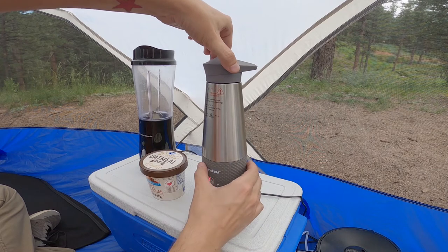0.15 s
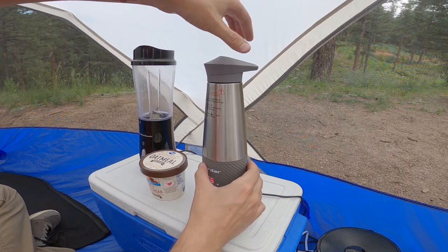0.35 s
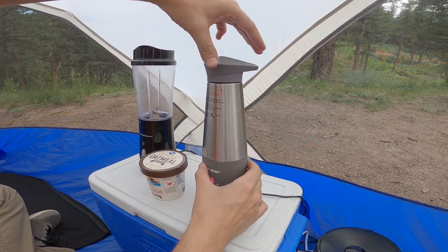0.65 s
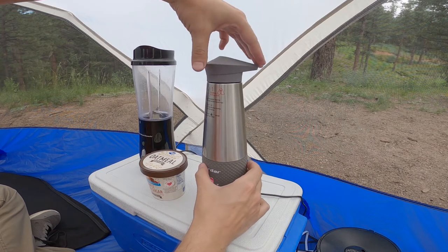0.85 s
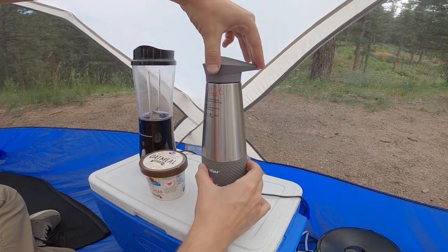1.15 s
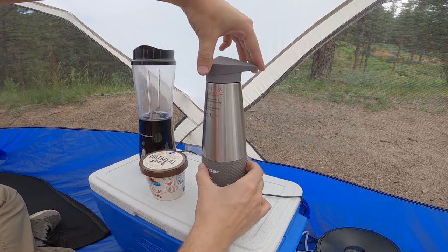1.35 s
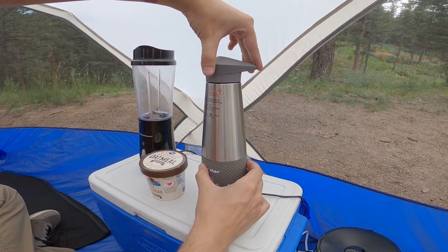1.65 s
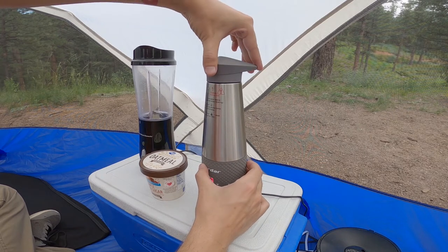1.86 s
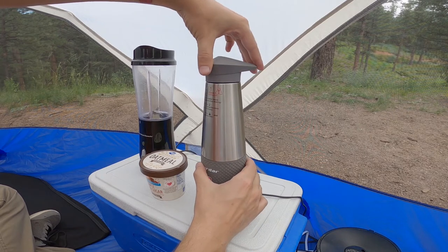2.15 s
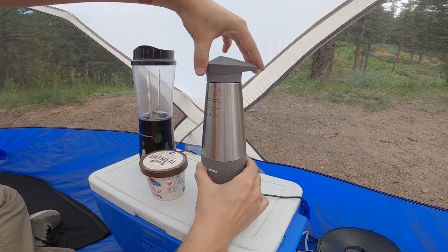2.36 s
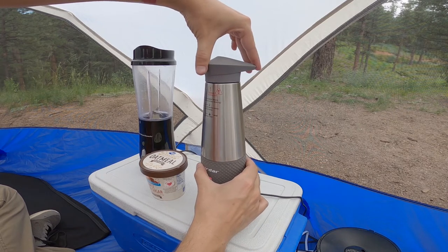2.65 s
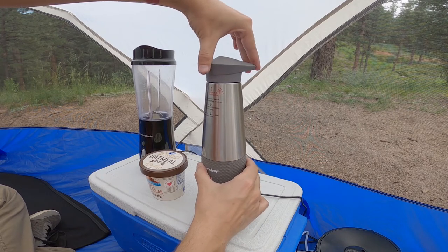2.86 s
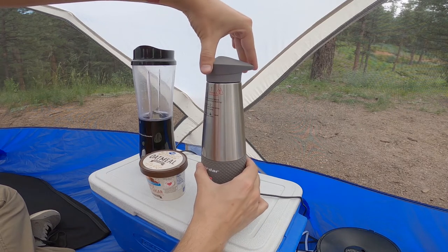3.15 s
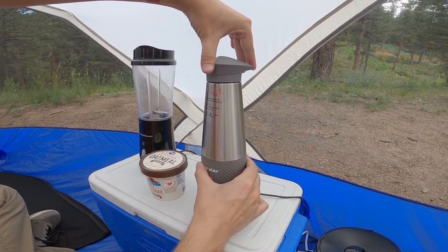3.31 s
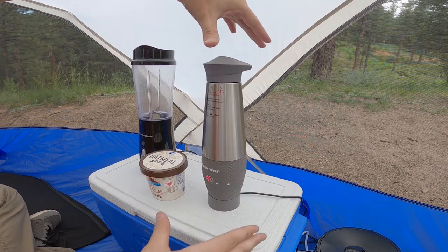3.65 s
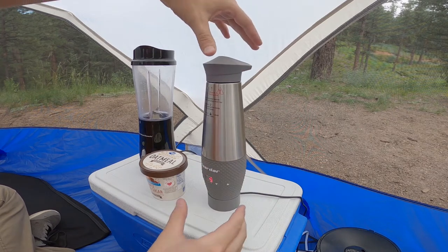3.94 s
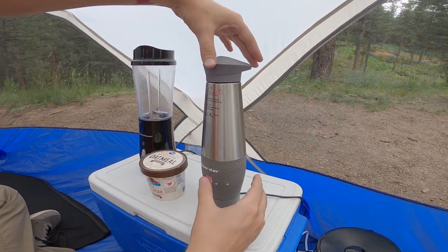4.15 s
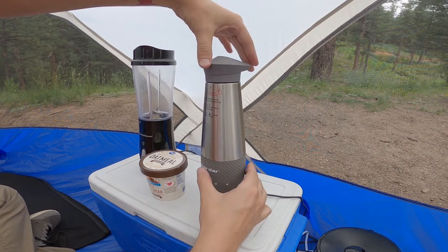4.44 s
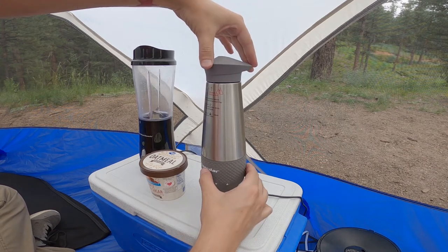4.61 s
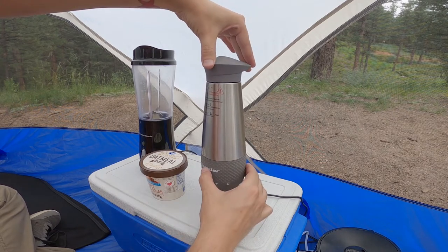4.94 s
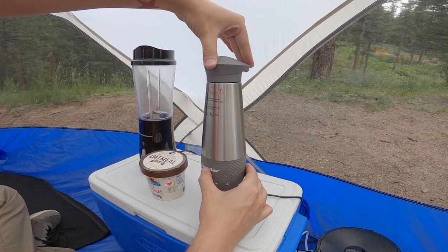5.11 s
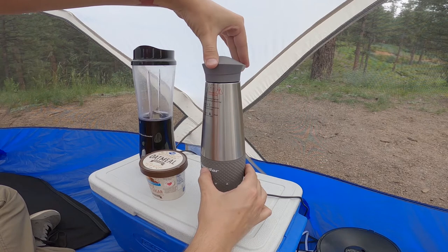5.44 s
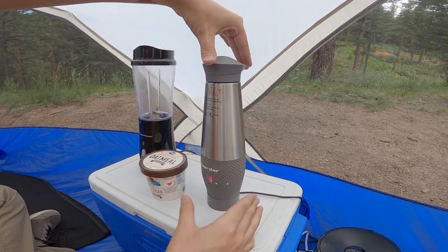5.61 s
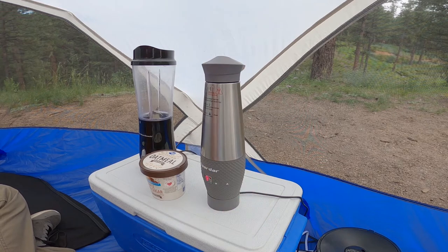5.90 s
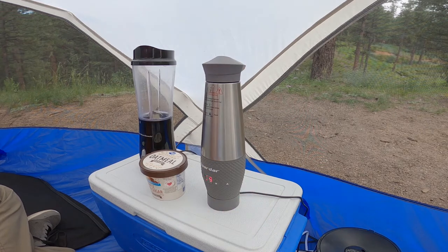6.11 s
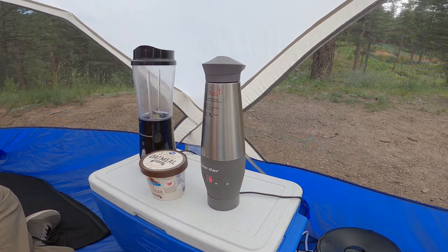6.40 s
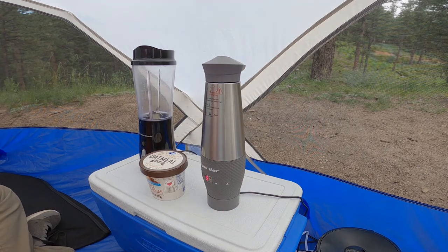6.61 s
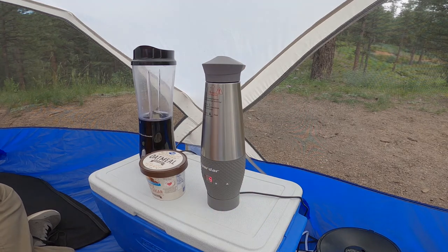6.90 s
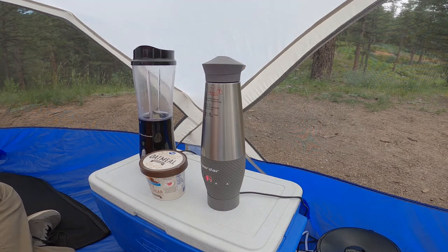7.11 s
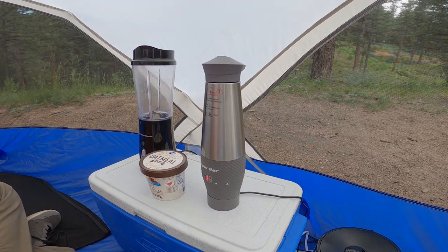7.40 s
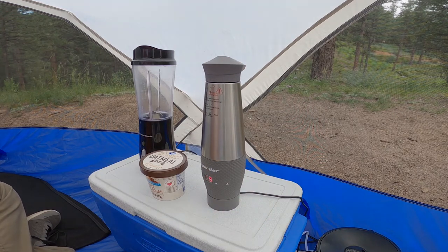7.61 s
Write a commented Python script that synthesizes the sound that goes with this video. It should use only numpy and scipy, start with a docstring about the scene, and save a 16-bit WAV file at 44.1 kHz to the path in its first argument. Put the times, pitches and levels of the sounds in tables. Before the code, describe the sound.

Very close stereo capture inside a tent: a steady, bright steam hiss leaks from a portable metal kettle, then chokes off. Small plastic ticks follow, then a cluster of sharp lid snaps and a second hiss. It stops again before a louder, open, spitting jet bursts out with a hollow gush and dull boiling thumps. Faint forest air stays underneath.

```python
"""Steam hisses from the seal of a pressurised travel kettle, stops, and escapes again after the lid ratchets round.
Patchy noise and droplet bursts make the jet, its colour shifting between two gripped vents and a free one;
once let go it blows more openly, keeping some of the second colour. Clicks snap the lid round, decaying
plastic modes make its ticks, and swells of low noise thump and boil. Faint forest air lies under it all.
The place is a tent, heard through a camera's two close microphone ports."""
import sys
import numpy as np
from scipy import signal
from scipy.fft import rfft, irfft, next_fast_len
from scipy.io import wavfile
from scipy.ndimage import uniform_filter1d, map_coordinates

SR = 44100
rng = np.random.default_rng(int(sys.argv[2]) if len(sys.argv) > 2 else 0)


def int16_out(signal):
    """Quantize to a 16-bit WAV file."""
    q = np.round(np.clip(np.atleast_2d(signal).T, -1, 1) * 32767)
    wavfile.write(sys.argv[1], SR, q.astype(np.int16))


N = 342202

# brief spurts of the open jet: (time [s], jet level [dB], throaty rush level [dB], length [s])
SPURTS = [(3.414, -37, -54, 0.012), (3.524, -33.5, -69, 0.047), (3.693, -43, -57, .025),
          (5.559, -30, -42.5, 0.027), (6.056, -26.5, -62, .02)]


def amp(db):
    """Decibels to gain."""
    return 10 ** (np.asarray(db) / 20)


def unit(x):
    """Scale to rms 1."""
    return x / np.sqrt(np.mean(x ** 2) + 1e-20)


def along(rows, hz, axis=1):
    """One column of a table, read on a log-frequency axis."""
    columns = np.transpose(rows)
    return np.interp(np.log(hz + 1), np.log(columns[0] + 1), columns[axis])


def curves(rows):
    """One value per sample for each column after the time."""
    times, *columns = np.transpose(rows)
    return [np.interp(np.arange(N) / SR, times, column) for column in columns]


def since(start):
    """Seconds elapsed since a moment, 0 before it."""
    return np.maximum(np.arange(N) / SR - start, 0)


def swell(start, rise):
    """A gain whose power climbs from 0 towards 1 after a moment."""
    return np.sqrt(1 - np.exp(-since(start) / rise))


def bell(x, centre, width):
    """A smooth hump of height 1."""
    return np.exp(-.5 * ((x - centre) / width) ** 2)


def humps(rows):
    """The summed gain of bell-shaped swells (time [s], level [dB], length [s])."""
    return sum(amp(db) * bell(np.arange(N) / SR, s, length) for s, db, length in rows)


def wobble(rate):
    """A smooth random curve with rate knots a second."""
    knots = rng.standard_normal(int(N * rate / SR) + 4)
    return map_coordinates(knots, [np.arange(N) * rate / SR])


def filtered(x, response):
    """x times a complex response of frequency."""
    m = next_fast_len(N + 8192)
    return irfft(rfft(x, m) * response(np.fft.rfftfreq(m, 1 / SR)), m)[..., :N]


def coloured(x, spectrum, bumps=()):
    """x at rms 1 with a broad spectrum and narrow resonances or notches on it."""
    def narrow_db(hz):
        return sum(db / (1 + (2 * (hz - centre) / width) ** 4) for centre, width, db in bumps)

    return unit(filtered(x, lambda hz: amp(along(spectrum, hz) + narrow_db(hz))))


def white():
    """Steady noise in three rows: direct, scattered left, scattered right."""
    return rng.standard_normal((3, N))


def turbulence(patchy_db):
    """Noise in the same three rows, its gain drifting in patches of time and frequency shared by all."""
    z = signal.stft(white(), nperseg=512)[2]
    patches = uniform_filter1d(rng.standard_normal(z.shape[1:]), size=3, axis=0)
    patches = uniform_filter1d(patches, size=24, axis=1)
    return unit(signal.istft(z * amp(patchy_db * unit(patches)), nperseg=512)[1][:, :N])


def scattered(x, t60, wet_db):
    """A sound and its short left and right echoes from the table and tent."""
    t = np.arange(SR // 8) / SR
    tails = rng.standard_normal((2, len(t))) * amp(-60 * t / t60)
    tails *= amp(wet_db) / np.linalg.norm(tails[0])
    return np.vstack([x, signal.fftconvolve(x[None], tails, axes=1)[:, :N]])


def reflected(x, echo_db, count=12):
    """Weak copies off nearby surfaces ripple the spectrum."""
    delays = rng.uniform(.002, .02, count)  # seconds
    sizes = amp(echo_db) * rng.choice([-1, 1], count) / np.sqrt(count)
    echoes = 0
    for delay, size in zip(delays, sizes):
        late = np.pad(x, ((0, 0), (round(delay * SR), 0)))[:, :N]
        echoes = echoes + size * late
    return x + echoes


def ports(field):
    """Both ports hear the direct sound, shifted and shaded by the camera body; each has its own scatter."""
    # the microphone pair: (frequency [Hz], left-right level [dB], left lag [rad], coherence [0-1])
    port_pair = [(200, 2.5, 0.45, 0.91), (500, -2.5, 0.7, 0.53), (1160, 1.3, 0.67, 0.94),
                 (2500, 2, 0.75, 0.8), (4200, 4, 0.86, 0.8), (5350, 4.4, 0.96, 0.42),
                 (6570, 9.5, 2.12, 0.87), (7110, -1, 2.54, 0.96), (7960, 8, 3.46, 0.98),
                 (8140, -11, 1.57, 1), (8700, -7.5, 1.14, 0.68), (9900, -2.5, 1.8, 0),
                 (12000, -7, 1.9, 0.4), (15000, -14.3, 1.59, 0.25)]
    sides = np.array([[1], [-1]])

    def alike(hz):
        return np.clip(along(port_pair, hz, axis=3), 0, 1)

    def lag(hz):
        return np.exp(-.5j * sides * along(port_pair, hz, axis=2))

    def shade(hz):
        return np.sqrt(2 / (1 + amp(-2 * sides * along(port_pair, hz))))

    direct = filtered(field[0], lambda hz: np.sqrt(alike(hz)) * lag(hz))
    diffuse = filtered(field[1:], lambda hz: np.sqrt(1 - alike(hz)))
    return filtered(direct + diffuse, shade)


def forest(level_db):
    """Soft outdoor air around the tent: patchy noise whose level wanders slightly."""
    # forest background: (frequency [Hz], density [dB per Hz])
    air_colour = [(20, -13), (45, -7.5), (105, -20.5), (155, 2.5), (210, -0.8), (330, -4.5), (550, -15),
                  (850, -16), (1200, -13.5), (2200, -21.5), (4500, -31), (7000, -31), (11000, -53),
                  (15000, -63.2)]
    return amp(level_db + 0.66 * wobble(4.32)) * coloured(turbulence(patchy_db=2.15), air_colour)


def thumps():
    """Low lumps boom in the cool box under the kettle, over the deep stir of the boiling water."""
    # dull thumps of handling and, once the lid is free, of boiling water: (time [s], level [dB], length [s])
    blow_times = [(1.908, -53, 0.0082), (2.555, -55, .016), (3.53, -53, 0.017), (3.688, -56.5, 0.05),
                  (4.08, -51.5, 0.033), (4.215, -51, 0.039), (5.01, -53, .01), (5.66, -39, 0.023),
                  (5.708, -38.5, 0.016), (5.919, -44, 0.025), (6.062, -51, 0.011), (6.289, -48, .02),
                  (6.619, -42, .022), (6.823, -49, .027), (7.194, -52, 0.014), (7.458, -52, .012),
                  (7.56, -58, 0.037), (7.692, -50, .012)]
    # boom of the cool box: (frequency [Hz], density [dB per Hz])
    box_boom = [(15, -16), (40, -15), (68, -5.5), (100, -11.5), (150, 2.5), (172, -1.5), (196, 5),
                (230, -6), (270, -21), (420, -39), (900, -120)]
    # deep stir: (frequency [Hz], density [dB per Hz])
    deep_colour = [(10, -16), (35, -7.5), (70, -2), (110, -17), (300, -120)]
    # the water boils up as the pressure drops, then settles
    boil_s, rise_s, sag_db_per_s = 5.5, .1, 3.5
    lumps_per_s, lump_db, lump_scatter_db = 20, -55, 2.5
    stir_db, stir_scatter_db, stir_per_blow_db = -59.5, 3.5, -20

    boil = swell(boil_s, rise_s) * amp(-sag_db_per_s * since(boil_s))
    blows = humps(blow_times)
    lumps = blows + boil * amp(lump_db + lump_scatter_db * wobble(lumps_per_s))
    stir = boil * amp(stir_db + stir_scatter_db * wobble(lumps_per_s))
    stir = stir + amp(stir_per_blow_db) * blows
    return stir * coloured(white(), deep_colour) + lumps * coloured(white(), box_boom)


def ticks():
    """The shut lid ticks under the fingers: decaying plastic modes ring beside short noise cracks."""
    # small ticks, before the gains below: (time [s], ring level [dB], crack level [dB])
    tick_times = [(1.8602, -47, -62), (1.8951, -40, -57), (1.9134, -48, -62), (1.9934, -53, -62),
                  (2.0184, -68, -60), (2.1301, -55, -41), (2.1545, -52, -47), (2.2997, -51, -52),
                  (2.4109, -57, -56)]
    # plastic lid modes, levels before a random scatter: (frequency [Hz], level [dB], 60 dB decay [s])
    lid_modes = [(1200, -11, .012), (1600, -6, .014), (2130, 0, .026), (2350, -7, .014), (3000, -13, .01),
                 (3680, -11, .017)]
    # a dry crack: (frequency [Hz], level [dB])
    crack_colour = [(900, -25), (2200, -8), (3500, 2), (5000, -4), (6600, 0), (9000, -10), (14000, -27)]
    t = np.arange(SR // 8) / SR
    rings, cracks = np.zeros((2, N))
    for s, ring_db, crack_db in tick_times:
        ring = np.zeros(len(t))
        for hz, level, t60 in lid_modes:
            fade = amp(level + rng.normal(0, 1.6) - 60 * t / t60)
            ring += fade * np.sin(2 * np.pi * (hz * t + rng.random()))
        ring *= 1 - np.exp(-t / .0005)  # soft attack
        crack = amp(-60 * t / .009) * rng.standard_normal(len(t))
        rings[round(s * SR):][:len(t)] += amp(ring_db + 1) * ring
        cracks[round(s * SR):][:len(t)] += amp(crack_db + 3) * crack
    dry_cracks = filtered(cracks, lambda hz: amp(along(crack_colour, hz)))
    return scattered(rings + dry_cracks, t60=.03, wet_db=-3)


def snaps():
    """Dry snaps of the turning lid and of spat drops: filtered impulses with extra treble."""
    # ratchet and drops, before the gains below: (time [s], level [dB], treble relative to it [dB])
    snap_times = [(3.307, -22.5, -14), (3.3643, -16.5, -34), (3.3968, -10, -7), (3.4343, -7.5, -28),
                  (3.4838, -19, -21), (5.3277, -20, -22), (5.3392, -15, -22), (6.034, -16, -26)]
    # body of a snap: (frequency [Hz], level [dB])
    snap_colour = [(150, -34), (700, -7.5), (1500, -3.5), (2800, 1), (5000, 2), (9000, -9.5), (15000, -31)]
    pulses, sharp = np.zeros((2, N))
    for s, db, treble_db in snap_times:
        at = round((s + 0.0012) * SR)
        pulses[at], sharp[at] = amp(db), amp(db + treble_db)
    clicks = amp(15) * filtered(pulses, lambda hz: amp(along(snap_colour, hz)))
    clicks += amp(5) * filtered(sharp, lambda hz: hz / (hz + 7000))
    return scattered(clicks, t60=0.019, wet_db=2.0)


def gush():
    """The first wide flow, as the lid comes fully loose, sounds hollow in the neck: it swells, holds and dies."""
    # hollow neck: (frequency [Hz], density [dB per Hz])
    neck_colour = [(150, -21), (260, -6), (380, 2), (500, -6), (650, -12), (2500, -120)]
    start_s, rise_s, hold_s, level_db, sag_db_per_s = 5.31, .08, 0.37, -54.5, 41
    gain = swell(start_s, rise_s) * amp(level_db - sag_db_per_s * since(start_s + hold_s))
    return gain * coloured(white(), neck_colour)


def droplets(rate, spread_db):
    """Dense tiny bursts of water torn apart in the gap, rate a second at random moments."""
    sizes = rng.standard_normal(N) * amp(spread_db * np.clip(rng.standard_normal(N), -2, 2))
    return scattered(unit(sizes * (rng.random(N) < rate / SR)), t60=0.042, wet_db=-2.5)


def flow():
    """Hisses rise, sag with pressure and are choked: jet dB, relative fizz gain, wetness, fresh-opening share."""
    # leak through the nearly shut seal, growing as the lid is eased: (time [s], level [dB])
    leak_levels = [(3.0, -75), (3.28, -57), (3.315, -40.5), (3.39, -39), (3.5, -59), (5.14, -53.5),
                   (5.18, -45), (5.23, -46), (5.31, -35.5)]
    # hisses of the opened seal: (gives way [s], rise [s], pressed shut [s], jet level [dB], sag [dB/s],
    # finest fizz relative to the jet at opening [dB], lasting wetness [0-1])
    hisses = [(-0.25, 0.22, 1.563, -33.5, .5, -21.5, .02), (3.393, .006, 4.68, -32.5, 2, -13.5, 0.14),
              (5.305, 0.17, 9, -24, 4, -13, 0.4)]
    leak_fizz_db, leak_wetness = -15.5, 0.25  # fizz relative to the leak; share torn by droplets
    shut_db_per_s2 = 275  # a closing seal chokes the jet ever faster
    # water on the seal is blown out after each opening: its share and time constant
    spit_wetness, spit_s = 0.23, 0.33
    fizz_sag = 0.54  # dB of fizz lost, relative to the jet, for each dB that the pressure sags

    power = amp(curves(leak_levels)[0]) ** 2
    fizz = power * amp(leak_fizz_db)
    wet = power * leak_wetness
    fresh = np.zeros(N)
    for opens, rise, shuts, db, sag, fizz_db, wetness in hisses:
        sag_db = sag * since(opens)
        choke_db = shut_db_per_s2 * since(shuts) ** 2
        hiss = (swell(opens, rise) * amp(db - sag_db - choke_db)) ** 2
        spit = np.exp(-since(opens) / spit_s)
        power = power + hiss
        fresh = fresh + hiss * spit
        fizz = fizz + hiss * amp(fizz_db - fizz_sag * sag_db)
        wet = wet + hiss * (wetness + spit_wetness * spit)
    power = power + humps([(s, db, length) for s, db, _, length in SPURTS]) ** 2
    return 10 * np.log10(power), fizz / power, np.clip(wet / power, 0, 1), fresh / power


def steam():
    """The jet at the lid's seal: turbulence and droplets, coloured by a shifting blend of three vents."""
    # how the jet's colour shifts between two gripped vents and the free one, which takes the rest:
    # (time [s], share of first grip's colour [0-1], share of second grip's colour [0-1])
    vent_shares = [(0, 0.77, 0), (.7, 1, 0.05), (1.9, 0.63, 0.27), (3.3, 0.3, 0.3), (3.8, 0.16, 0.73),
                   (5.1, 0.26, 0.96), (5.35, 0.17, 0.63), (5.65, 0.2, 0.05), (6.2, 0, 0.33)]
    # broad colour of the hiss: (frequency [Hz], density [dB per Hz])
    jet_colour = [(100, -29), (550, -27), (850, -25.5), (1080, -6), (1900, -2.5), (2600, 1.5), (4500, -1),
                  (5400, -3), (7000, -0.5), (8100, -9), (9000, -8), (10200, -14.5), (12000, -16),
                  (15000, -23.5)]
    # resonances and notches of the two gripped vents and the free one: (frequency [Hz], width [Hz], level [dB])
    first_vent = [(1290, 210, 0.5), (1580, 136, -7.5), (2650, 280, 1.5), (3360, 710, 1), (3770, 300, -3),
                  (4640, 420, 3), (5580, 140, 3), (6680, 140, 0), (12000, 350, 6)]
    second_vent = [(1355, 330, 3.5), (1666, 230, -7.5), (2320, 130, 4), (2790, 130, -6), (2930, 110, 2.5),
                   (3340, 460, 3), (3680, 240, 0.5), (4190, 270, 4), (4830, 260, 4), (5130, 130, 1.5),
                   (12000, 320, 3)]
    free_vent = [(980, 116, 7), (1470, 150, 1), (1754, 120, 3.5), (1805, 53, -4), (2350, 79, 3),
                 (2540, 310, -5.5), (3190, 260, -3.5), (3770, 110, 4.5), (4140, 390, -3.5), (5220, 330, -2),
                 (5920, 180, 4), (8550, 790, 4), (9360, 270, 5.5), (10380, 300, 6.5), (12200, 350, 0)]
    # throaty part of the flow: (frequency [Hz], density [dB per Hz])
    rush_colour = [(120, -16), (200, -4), (330, 4), (560, -0.5), (800, 5.5), (1100, 7), (1600, -28),
                   (4000, -120)]
    # the two notes of the gap: (frequency [Hz], density [dB per Hz])
    high_note = [(2250, -120), (2560, 3.5), (2600, 0), (2680, -7), (3100, -120)]
    low_note = [(1600, -120), (2120, -10.5), (2180, 4), (2280, -5), (2850, -120)]
    # the gap sings its high note now and then: (time [s], level relative to the jet [dB], length [s])
    whistles = [(1.52, -13, 0.27), (3.55, -8, 0.07)]
    high_note_db = -22.5  # its faint steady level relative to the jet
    rush_db, spit_rush_db = -29, 10  # rush relative to the jet; extra rush at a fresh opening
    narrow_db, narrow_width_db = -52.5, 3.5  # jet level, and range around it, of a nearly shut gap
    narrow_note_db, narrow_rush_db = -10, 13  # there: low note relative to the jet, and extra rush
    waver_db, waver_per_s = 0.27, 12  # slow unsteadiness of the flow

    jet_db, fizz_gain, wet, fresh = flow()
    narrow = bell(jet_db, narrow_db, narrow_width_db)

    dry_part = np.sqrt(1 - wet) * turbulence(patchy_db=1.7)
    wet_part = np.sqrt(wet) * droplets(rate=2600, spread_db=2.0)
    source = reflected(dry_part + wet_part, echo_db=-17)

    first, second = np.clip(curves(vent_shares), 0, 1)
    free = np.clip(1 - first - second, 0, 1)
    vents = (first, first_vent), (second, second_vent), (free, free_vent)
    jet = sum(share * coloured(source, jet_colour, vent) for share, vent in vents)

    # split off the finest fizz, above about 10 kHz
    fine = filtered(jet, lambda hz: 1 / (1 + (10300 / (hz + 1)) ** 14))
    body, fizz = unit(jet - fine), unit(fine)

    rush_gain = amp(jet_db + rush_db + spit_rush_db * fresh + narrow_rush_db * narrow)
    rush_gain = rush_gain + humps([(s, db, length) for s, _, db, length in SPURTS])
    rush = rush_gain * coloured(white(), rush_colour)

    high = (amp(high_note_db) + humps(whistles)) * coloured(white(), high_note)
    low = amp(narrow_note_db) * narrow * coloured(white(), low_note)

    # water in the gap makes the flow flutter
    flutter_db = (0.23 + 0.69 * wet) * wobble(70) + waver_db * wobble(waver_per_s)
    return amp(flutter_db) * (amp(jet_db) * (body + fizz_gain * fizz + high + low) + rush)


def scene():
    """The kettle close to the camera; forest air from all sides is only partly alike at the two ports."""
    air = forest(level_db=-58.0)
    shared_air, separate_air = amp(-7.0) * air[0], amp(-0.5) * air[1:]
    kettle = thumps() + ticks() + snaps() + gush() + steam()
    return ports(kettle) + shared_air + separate_air


def record(dry):
    """The camera keeps nothing above its band limit."""
    top_hz = 15830
    return filtered(dry, lambda hz: hz < top_hz)


dry = scene()
out = record(dry)
int16_out(out)
```